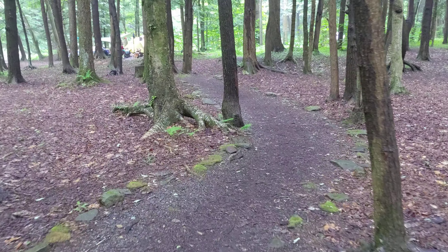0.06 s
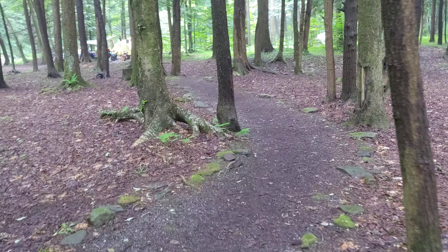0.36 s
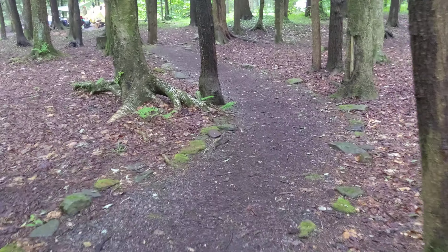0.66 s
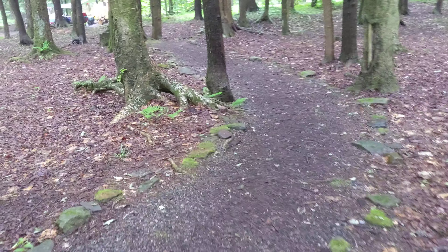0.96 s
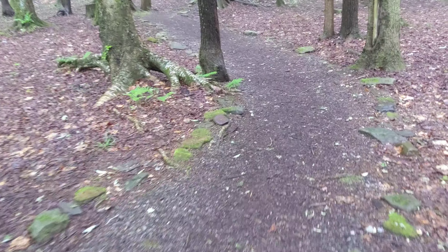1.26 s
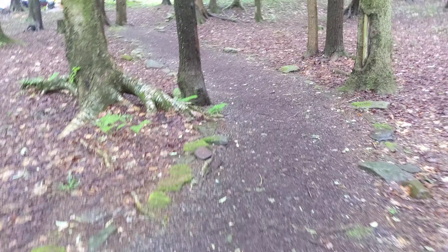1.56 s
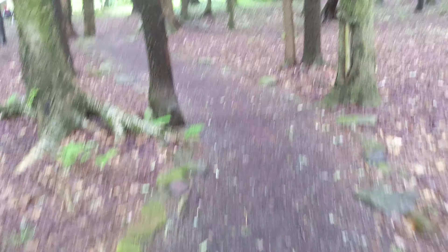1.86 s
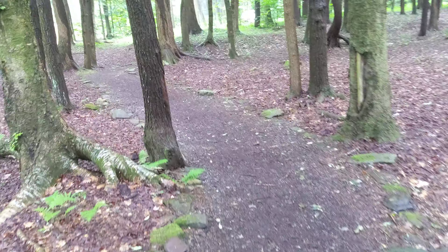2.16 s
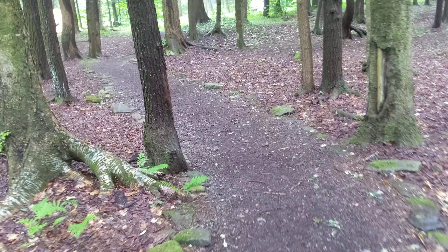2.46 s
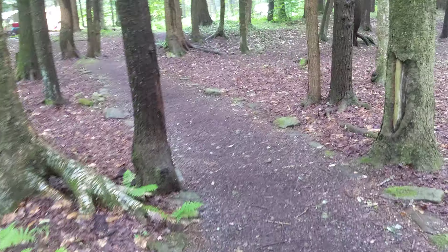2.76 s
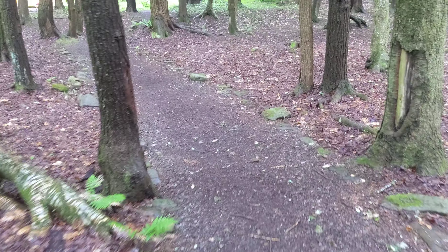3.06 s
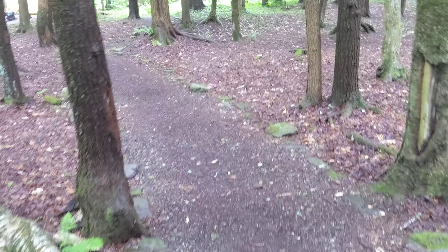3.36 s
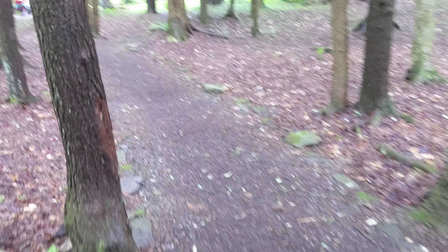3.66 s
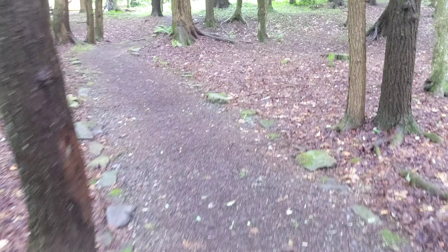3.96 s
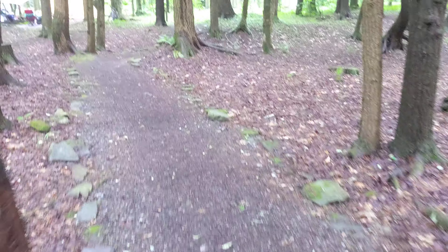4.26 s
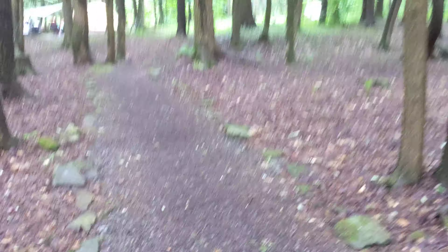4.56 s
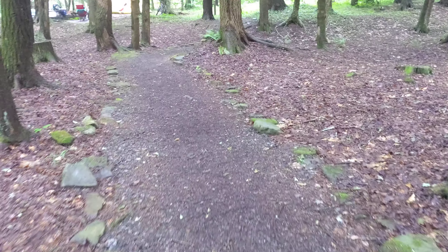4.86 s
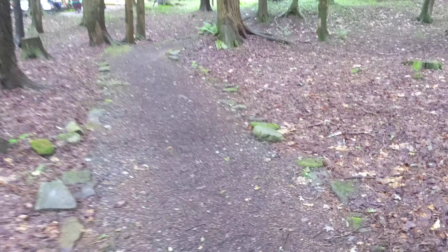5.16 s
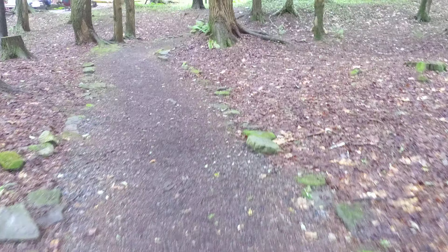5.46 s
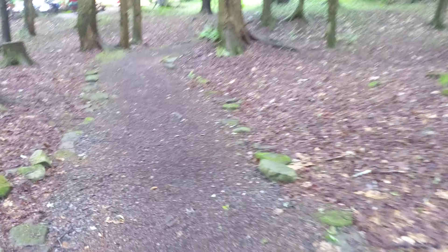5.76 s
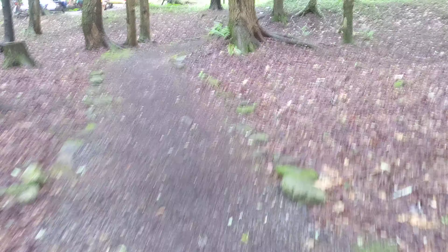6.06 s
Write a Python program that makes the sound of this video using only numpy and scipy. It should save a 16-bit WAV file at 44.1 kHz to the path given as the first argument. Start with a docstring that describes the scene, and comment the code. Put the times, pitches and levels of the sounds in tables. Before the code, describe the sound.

A close songbird on the right whistles rapid, high, gliding chirps from the start, each leaving a long echo among the trees. Just below the moving microphone, soft footsteps thud on a dirt trail about every 0.6 seconds, with light gritty crunches, scuffs and pebble ticks. A faint, short, hoarse bird call comes from far off at 1 second. Twigs snap underfoot, sharpest at about 1.4 seconds, and again near 3.3, 5.7 and 6. From 1.8 to 2.5 seconds a quick trill of falling notes sounds on the right. Between 2.7 and 4.1 seconds a thin, very high bird repeats a drooping whistle on the left. The near song thins after 3.7 seconds, and a farther bird gives six rising notes from 4.3 to 5.4. A quiet woodland hush runs throughout, with a faint, low, distant engine hum growing from about 3 seconds.

```python
"""A dirt trail under tall trees, heard from a stereo microphone carried at walking pace. From the start
a near bird whistles on the right, the trunks scattering each note into a long tail, while just below
the microphone soft steps thud, scuff the grit and snap twigs. A hoarse call comes from far off at one
second and a trill follows near two. Midway a thin voice droops on the left; then a farther bird repeats
a rising slur, and a distant engine hum grows over the hush of the wood."""
import sys
import numpy as np
from scipy import signal
from scipy.fft import rfft, irfft
from scipy.io import wavfile
from scipy.ndimage import uniform_filter1d

SR = 44100
rng = np.random.default_rng(int(sys.argv[2]) if len(sys.argv) > 2 else 0)


def wrap_up_sound(samples):
    """Save the sound to the file named by the first command line argument, as 16-bit audio."""
    columns = np.atleast_2d(samples).T
    # keep every value between -1 and 1, then stretch to whole-number steps
    tamed = np.clip(columns, -1, 1)
    steps = np.round(tamed * 32767).astype(np.int16)
    wavfile.write(sys.argv[1], SR, steps)


N = 269607
TIME = np.arange(N) / SR


def amp(db):
    """Decibels to gain."""
    return 10 ** (np.asarray(db) / 20)


def unit(x):
    """Scales to rms 1."""
    return x / np.sqrt(np.mean(x ** 2) + 1e-20)


def read(points, hz):
    """A table's value on a log-frequency axis."""
    f, value = np.transpose(points)
    return np.interp(np.log(hz + 1), np.log(f + 1), value)


def sides(db):
    """Left and right gains of constant power; positive dB leans left."""
    pair = np.array([amp(db / 2), amp(-db / 2)]).reshape(2, -1)
    return pair / np.sqrt(np.mean(pair ** 2, axis=0))


def add(mix, s, sound):
    """Mixes a sound in at s seconds."""
    part = mix[..., max(round(s * SR), 0):][..., :sound.shape[-1]]
    part += sound[..., :part.shape[-1]]


def colour(x, gain):
    """Filters by a gain that is a function of frequency."""
    return irfft(rfft(x) * gain(np.fft.rfftfreq(x.shape[-1], 1 / SR)), x.shape[-1])


def wander(hz):
    """Random drift of rms 1, up to about hz."""
    return unit(colour(rng.standard_normal(N), lambda f: 1 / (1 + (f / hz) ** 4)))


def band(x, hz, q):
    """A broad resonance that rings after its cause."""
    return signal.lfilter(*signal.iirpeak(min(hz, SR / 3), max(q, .4), SR), x)


def from_right(pair, lag_s):
    """A sound from the right reaches the left microphone a little later."""
    return colour(pair, lambda f: np.exp(-2j * np.pi * f * np.array([[lag_s], [0]])))


# The wood's background. Each row: frequency in Hz, relative spectral level in dB.
HUSH_SPECTRUM = [(20, -35), (32, 6.5), (55, 0.5), (110, 1.5), (170, 1), (300, -5.5), (450, -8.5),
                 (700, -3.5), (900, -7.5), (1350, -2), (2000, -9), (5000, -6.5), (9000, -22), (12500, -19),
                 (15500, -27.5)]
# Its swell. Each row: time in seconds, level in dB.
HUSH_SWELL = [(0, -52), (2, -51.5), (4, -51), (5.2, -48.5), (6.1, -49.5)]
# Its width. Each row: frequency in Hz, likeness of the two channels from 0 to 1.
HUSH_LIKENESS = [(30, 0.51), (100, 0.61), (500, 0.87), (1200, 0), (2500, 0.33), (5000, 0), (12000, 0.06)]
# Its lean. Each row: frequency in Hz, left over right in dB.
HUSH_PAN = [(100, -2), (1000, 0), (3000, -4), (8000, -3.5), (14000, -1)]
def hush(patch_db=1.76):
    """Distant air and leaves in drifting patches, most alike at both microphones in the low range."""
    hz = np.fft.rfftfreq(1024, 1 / SR)
    a, b, c, d, patches = rng.standard_normal((N // 256 + 5, len(hz), 5)).T
    patches = unit(uniform_filter1d(uniform_filter1d(patches, size=12, axis=0), size=16, axis=1))
    likeness = read(HUSH_LIKENESS, hz)[:, None]
    left = a + 1j * b
    right = likeness * left + np.sqrt(1 - likeness ** 2) * (c + 1j * d)
    gain = amp(read(HUSH_SPECTRUM, hz)[:, None] + patch_db * patches)
    spectra = np.array([left, right]) * gain * sides(read(HUSH_PAN, hz))[:, :, None]
    air = signal.istft(spectra, nperseg=1024, noverlap=768)[1][:, :N]
    return unit(air) * amp(np.interp(TIME, *np.transpose(HUSH_SWELL)))


# The engine's growth. Each row: time in seconds, relative level in dB.
ENGINE_LEVEL = [(0, -81), (.45, -65), (2.1, -64), (2.6, -71), (2.85, -58), (3.4, -56.5), (4.2, -57),
                (4.7, -53), (6.1, -51.5)]
# Its note. Each row: time in seconds, pitch in Hz.
ENGINE_PITCH = [(0, 86.5), (1.8, 83.04), (3.2, 82.64), (4.2, 85.3), (6.1, 87.36)]
def engine_hum(gain_db=1.0, octave_db=-14, waver_db=1, waver_hz=0.41):
    """An engine far from the trail: a wavering low tone and its octave."""
    turns = np.cumsum(np.interp(TIME, *np.transpose(ENGINE_PITCH)) + waver_hz * wander(2.7)) / SR
    tone = np.sin(2 * np.pi * turns) + amp(octave_db + 2 * wander(4.8)) * np.sin(4 * np.pi * turns)
    db = np.interp(TIME, *np.transpose(ENGINE_LEVEL)) + gain_db + waver_db * wander(8.1)
    return np.sqrt(2) * tone * amp(db)


def far_call(start_s=0.98, length_s=0.11, level_db=-45, hz=1470, q=7, fade_db=-10, pan_db=-3):
    """One short hoarse note from far off, fading among the trees."""
    rasp = unit(band(band(rng.standard_normal(SR // 2), hz, q), hz, q)[:int(length_s * SR)])
    fade = amp(level_db + fade_db * np.linspace(0, 1, len(rasp)))
    out = np.zeros(N)
    add(out, start_s, fade * rasp * signal.windows.tukey(len(rasp), .5))
    return out * sides(pan_db)


# The brightness of grit and stones. Each row: frequency in Hz, relative spectral level in dB.
GRIT_SPECTRUM = [(2000, -6), (5000, 7), (9000, 3.5), (12500, 5), (14200, -5), (15500, -7)]
# Crunches underfoot. Each row: start in seconds, length in seconds, relative level in dB.
SOLE_ROLLS = [(.05, 0.11, -60), (0.255, 0.11, -56), (0.378, 0.19, -59), (.86, 0.31, -60), (1.207, .17, -60),
              (1.44, 0.095, -52), (1.518, 0.1, -58), (1.67, 0.14, -61), (1.855, 0.27, -61),
              (2.056, 0.18, -62), (2.264, 0.12, -69), (2.382, 0.12, -64), (2.608, 0.11, -55),
              (2.715, 0.092, -56.5), (2.879, .07, -57), (2.94, .15, -66), (3.24, 0.22, -59.5),
              (3.46, 0.26, -73), (3.784, .11, -58), (3.87, 0.26, -68), (4.243, 0.12, -55.5),
              (4.39, 0.11, -53), (4.59, .08, -69), (4.872, 0.23, -58), (5.55, 0.15, -65), (5.808, .3, -72)]
def litter(ticks_per_s=2500, spread_db=-2.0, tick_s=0.00044, gain_db=-1, idle_db=-72):
    """Fine grit and leaf crumbs crunch in soft swells as the weight rolls over them."""
    weight = np.full(N, amp(idle_db))
    for s, length, db in SOLE_ROLLS:
        add(weight, s, amp(db) * signal.windows.hann(int(length * SR)))
    strengths = amp(spread_db * np.minimum(rng.exponential(1, N), 4))
    ticks = strengths * (rng.random(N) < ticks_per_s / SR)
    decays = signal.lfilter([1], [1, -np.exp(-1 / (tick_s * SR))], ticks)
    crackle = decays * rng.standard_normal((2, N))
    return amp(gain_db) * weight * unit(colour(crackle, lambda f: amp(read(GRIT_SPECTRUM, f))))


# Stones touching on the trail. Each row: time in seconds, relative level in dB.
STONE_TICKS = [(0.396, -48), (0.9287, -38), (1.024, -37.5), (1.4413, -48), (1.557, -49), (2.5173, -45),
               (2.745, -43), (3.333, -51), (3.594, -46), (4.16, -53), (4.64, -52), (4.927, -51),
               (5.105, -45), (5.48, -52), (6.0722, -30.5)]
def pebbles(t60=0.0063, lead_s=.005, scatter_db=-17, scatter_t60=0.12, grains_per_s=700, pan_db=-3):
    """Two small stones grind into a bright tick and scatter a few grains."""
    out, t = np.zeros((2, N)), np.arange(SR // 10) / SR - lead_s
    for s, db in STONE_TICKS:
        grains = unit(rng.standard_normal((2, len(t))) * (rng.random(len(t)) < grains_per_s / SR))
        tick = rng.standard_normal((2, len(t))) * amp(-60 * abs(t) / t60)
        scatter = grains * amp(scatter_db - 60 * abs(t) / scatter_t60)
        add(out, s - lead_s, amp(db) * (tick + scatter))
    return colour(out, lambda f: amp(read(GRIT_SPECTRUM, f))) * sides(pan_db)


# Soles slipping. Each row: start in seconds, length in seconds, relative level in dB, band centre in Hz.
SOLE_SLIPS = [(0.295, 0.11, -54.5, 946), (0.893, 0.073, -55, 700), (1.001, 0.049, -42, 780),
              (1.101, 0.055, -54, 887), (1.227, 0.079, -52, 900), (1.449, 0.05, -47.5, 1630),
              (2.416, 0.052, -50, 800), (3.314, 0.053, -43.5, 1400), (3.8, 0.063, -54, 1030),
              (4.489, 0.088, -52.5, 755), (4.991, 0.063, -49, 1720), (5.016, 0.043, -33, 2760),
              (5.584, 0.14, -52, 840)]
def scuffs(grains_per_s=1500, spread_db=2.5, q=0.4, dull_hz=3300, pan_db=-4):
    """Grains of damp dirt slip under the sole in a short swell."""
    out, size = np.zeros(N), SR // 4
    for s, length, db, hz in SOLE_SLIPS:
        grains = rng.standard_normal(size) * amp(spread_db * rng.exponential(1, size))
        grains *= rng.random(size) < grains_per_s / SR
        swell = signal.windows.hann(int(length * SR))
        scrape = unit(band(band(grains, hz, q), hz, q)[:len(swell)])
        add(out, s, amp(db) * swell * scrape)
    return colour(out, lambda f: 1 / np.sqrt(1 + (f / dull_hz) ** 8)) * sides(pan_db)


# Twigs underfoot. Each row: time in seconds, click level in dB, lower and upper band edge in Hz.
TWIGS = [(0.1255, -32, 1400, 3000), (0.1337, -28.5, 1520, 1820), (0.341, -35, 600, 1580),
         (0.9286, -34.5, 350, 1690), (1.024, -29.5, 340, 1290), (1.03, -34, 594, 2000),
         (1.4411, -9, 1250, 2780), (1.557, -22, 1090, 2460), (1.5821, -17.5, 450, 1490),
         (2.768, -33, 550, 1590), (3.3331, -22, 493, 1690), (5.663, -27, 600, 1400),
         (5.6998, -18, 760, 1310), (6.0724, -22, 1100, 3120)]
def twig_snaps(bounce_s=0.0055, bounce_db=-19, rattle_db=-25, rattle_t60=0.06, pan_db=-4.5):
    """A twig snaps close by: a dry click, its bounce off the ground and a faint rattle."""
    out, t = np.zeros(N), np.arange(SR // 10) / SR
    for s, db, low_hz, high_hz in TWIGS:
        twig = np.vstack([signal.butter(2, low_hz, "high", fs=SR, output="sos"),
                          signal.butter(7, high_hz, fs=SR, output="sos")])
        click = signal.sosfilt(twig, signal.unit_impulse(len(t)))
        click /= abs(click).max()
        rattle = unit(signal.sosfilt(twig, rng.standard_normal(len(t))))
        rattle *= amp(rattle_db - 60 * t / rattle_t60)
        start = s - np.argmax(abs(click)) / SR
        add(out, start, amp(db) * (click + rattle))
        add(out, start + bounce_s, amp(db + bounce_db) * click)
    return out * sides(pan_db)


# Footfalls below the microphone. Each row: start in seconds, relative level in dB,
# opening pitch in Hz, seconds to fall by 60 dB.
FOOTFALLS = [(0.327, -42.5, 272, 0.14), (0.924, -42, 265, 0.18), (1.53, -41.5, 166, 0.083),
             (2.109, -39, 190, 0.12), (2.666, -31.5, 426, 0.025), (3.177, -41.5, 235, 0.053),
             (3.284, -38, 213.5, 0.16), (3.857, -43.5, 270.6, 0.2), (4.424, -39, 213, 0.25),
             (5, -27, 288, 0.062), (5.566, -40.5, 241, 0.21), (6.07, -27, 237, 0.092)]
def steps(sag=0.447, sag_s=0.014, rise_s=0.00011, knock_db=-3,
          earth_db=-6, earth_ratio=0.79, earth_q=0.79, pan_db=-4):
    """A heel thuds on packed earth: a sagging low knock inside a dull burst of crumbling soil."""
    out, t = np.zeros(N), np.arange(SR // 4) / SR
    for s, db, hz, t60 in FOOTFALLS:
        turns = np.cumsum(hz * (1 - sag + sag * np.exp(-t / sag_s))) / SR
        earth_hz = hz * earth_ratio
        earth = unit(band(band(rng.standard_normal(len(t)), earth_hz, earth_q), earth_hz, earth_q))
        thud = amp(knock_db) * np.sin(2 * np.pi * turns) + amp(earth_db) * earth
        add(out, s, thud * amp(db - 60 * t / t60) * (1 - np.exp(-t / rise_s)))
    return out * sides(pan_db)


# The tail among the trees. Each row: frequency in Hz, seconds to fall by 60 dB.
TRUNK_DECAY = [(2500, 1.76), (4200, 1.4), (5500, 2.06), (8000, 1.4)]
def trunks(x, build_s=0.0017, first_per_s=260, thicken_s=.07, early_db=6, early_s=.045):
    """Scatter from many trunks: single echoes at first, then ever denser ones that die by band."""
    size = 2 * SR
    per_s = np.minimum(first_per_s * (1 + np.arange(size) / SR / thicken_s) ** 2, 2500)
    polarity = np.sign(rng.standard_normal((2, size)))
    taps = polarity * (rng.random((2, size)) < per_s / SR) / np.sqrt(per_s)
    hz, t, spectra = signal.stft(taps, SR, nperseg=256)
    t60 = read(TRUNK_DECAY, hz)[:, None]
    near_db = early_db * np.exp(-t / early_s)  # the nearest trunks crowd the first echoes
    shape = amp(near_db - 60 * t / t60) * (1 - np.exp(-t / build_s)) / np.sqrt(t60)
    tail = signal.istft(spectra * shape, SR, nperseg=256)[1]
    tail /= np.linalg.norm(tail, axis=1, keepdims=True)
    return signal.fftconvolve(x[None], tail, axes=1)[:, :N]


# Where the echoes come from. Each row: frequency in Hz, left over right in dB.
ECHO_PAN = [(2500, -2), (3400, -15.5), (4300, -10), (5200, -7), (6200, -6), (7000, -4), (8000, 0.5)]
def passing_trunks(x, change_s=0.5763, count=3):
    """Echo patterns fade into one another as the microphone moves among the trunks."""
    turn = np.pi * (TIME / change_s + np.arange(count)[:, None] / count)
    echoes = sum(trunks(x * share) for share in np.sqrt(2 / count) * np.cos(turn))
    return colour(echoes, lambda f: sides(read(ECHO_PAN, f)))


# A faint whistle on the left. Each row: start in seconds, length in seconds, relative level in dB.
HELD_NOTES = [(3.45, 0.12, -54), (3.55, 0.13, -47), (3.841, 0.14, -48), (4.072, .1, -57)]
def thin_whistle(hz=7711, waver_hz=16, flutter_db=3, pan_db=3, gain_db=-7):
    """A very high, nearly pure note that swells on one pitch and lingers among the trunks."""
    strength = np.zeros(N)
    for s, length, db in HELD_NOTES:
        add(strength, s, amp(db) * signal.windows.hann(int(length * SR)))
    turns = np.cumsum(hz + waver_hz * wander(60)) / SR
    tone = np.sqrt(2) * np.sin(2 * np.pi * turns) * strength * amp(flutter_db * wander(40))
    return amp(gain_db) * (tone + trunks(tone)) * sides(pan_db)


def glide(from_hz, to_hz, ease=1.172):
    """Pitches of a note that moves fast at first and settles on its last pitch."""
    return to_hz + (from_hz - to_hz) * np.array([1, 2 / 3, 1 / 3, 0]) ** ease


# A glide grows as it goes: accents in dB at its start and end.
GLIDE_ACCENTS = [-1.5, 0.7]
# Faint high shimmer over the near song, and distant twitter.
# Each row: start and end in seconds, lowest and highest pitch in Hz, relative level in dB.
TWITTER_BOUTS = [(0.384, .68, 7600, 9260, -62.5), (1.412, 1.52, 7240, 8150, -50.5),
                 (3.201, 4.16, 7280, 7920, -58.5), (4.16, 4.52, 6760, 8040, -52.5),
                 (4.498, 5.3, 2997, 4720, -55.5), (4.661, 4.78, 11100, 12400, -62),
                 (5.569, 5.78, 2704, 4870, -50)]
def twitter(per_s=70, length_s=0.01785, pan_db=-10, echo_db=20):
    """Bouts of faint glides at loose intervals, heard mostly as echo."""
    notes = []
    for start, end, low, high, db in TWITTER_BOUTS:
        levels = np.add(db, GLIDE_ACCENTS)
        for s, (late, first, last) in zip(np.arange(start, end, 1 / per_s), rng.random((64, 3))):
            pitches = glide(low + first * (high - low), low + last * (high - low))
            notes.append((s + late / per_s, length_s, pitches, levels, pan_db, echo_db))
    return notes


# Stress along a slur: accents in dB from start to end.
SLUR_ACCENTS = [-5, 1, 1, -1, -0.5, 2, -1]
# A farther bird. Each row: start in seconds, relative level in dB, first pitch in Hz.
RISING_SLURS = [(4.345, -52.5, 3740), (4.51, -45.5, 3787), (4.685, -45.5, 3760), (4.86, -45, 3606),
                (5.06, -46.5, 3324), (5.25, -47.5, 3550)]
def slurs(length_s=.14, rise_hz=(4143, 4456, 4985, 5480, 5670), pan_db=-4, echo_db=4,
          flick_at_s=.126, flick_s=0.019, flick_hz=(6700, 6100, 5800), flick_accents_db=(-8, 1)):
    """One rising slur repeated a little to the right, each ending in a quick downward flick."""
    rises = [(s, length_s, [hz, *rise_hz], np.add(db, SLUR_ACCENTS), pan_db, echo_db)
             for s, db, hz in RISING_SLURS]
    flicks = [(s + flick_at_s, flick_s, flick_hz, np.add(db, flick_accents_db), pan_db, echo_db)
              for s, db, _ in RISING_SLURS]
    return rises + flicks


# Stress along a drooping note: accents in dB from start to end.
DROOP_ACCENTS = [-1.5, -3, 1.5, -3.5, 5.5]
# A thin voice on the left. Each row: start in seconds, relative level in dB.
DROOPING_NOTES = [(2.725, -45.5), (2.98, -50.5), (3.24, -47), (3.5, -47), (3.746, -47), (3.961, -49)]
def droops(length_s=.18, pitches_hz=(7280, 7010, 6990, 6690, 5280), pan_db=3, echo_db=2):
    """A bird holds a high note and lets it drop, loudest at the bottom."""
    return [(s, length_s, pitches_hz, np.add(db, DROOP_ACCENTS), pan_db, echo_db)
            for s, db in DROOPING_NOTES]


# A trill on the right. Each row: start in seconds, first and last pitch in Hz, relative level in dB.
TRILL_NOTES = [(1.804, 5070, 4140, -34), (1.912, 4720, 4154, -33.5), (2.006, 4627, 4255, -30),
               (2.105, 4620, 4190, -30.5), (2.203, 4564, 4140, -31), (2.302, 4570, 4145, -31),
               (2.402, 4580, 4120, -32.5)]
def trill(length_s=.041, accents_db=(-0.5, 1.5, 1.8), pan_db=-7, echo_db=1.5):
    """A quick run of like down-slurs that starts high and settles."""
    return [(s, length_s, glide(first, last), np.add(db, accents_db), pan_db, echo_db)
            for s, first, last, db in TRILL_NOTES]


# The near bird's glides. Each row: start and length in seconds, first, middle and last pitch in Hz,
# relative level in dB, echo weight in dB.
SONG_GLIDES = [(0.0, 0.023, 4570, 4396, 4230, -35.5, 8), (0.03, 0.029, 4060, 3670, 3470, -36.5, 6),
               (.083, 0.053, 5880, 6440, 5280, -44, 4), (0.151, 0.096, 3985, 4144, 4040, -39.5, 5),
               (0.304, 0.043, 6000, 6480, 5180, -42.5, 4), (0.26, 0.026, 7060, 7400, 7450, -48.5, 7),
               (0.375, 0.033, 4170, 3884, 3300, -29, -1.5), (0.409, 0.034, 3190, 2930, 2830, -40.5, 18),
               (0.443, 0.034, 3000, 3770, 4600, -35.5, 2), (0.458, 0.043, 4770, 4740, 4600, -36, 7),
               (0.483, 0.026, 4310, 3830, 3240, -38, -12), (.605, 0.034, 4830, 5180, 5230, -36, 11),
               (0.639, .032, 5020, 4370, 3880, -36.5, 4), (.692, 0.043, 6460, 6930, 7180, -45.5, 4),
               (0.761, 0.045, 5160, 5180, 5250, -36, 4), (.762, 0.061, 3180, 3476, 3840, -38.5, 8),
               (.803, 0.02, 3580, 3784, 3800, -26, 7.5), (0.819, 0.034, 3753, 3450, 3280, -31, 1),
               (0.851, .05, 3470, 3660, 4010, -36, 9), (0.893, 0.061, 3840, 4247, 4400, -32.5, 3.5),
               (.925, 0.061, 3630, 3680, 3720, -36, -7), (1.004, 0.04, 4156, 4270, 4580, -32.5, 1.5),
               (1.065, 0.036, 5430, 5950, 6130, -37.5, 13), (1.19, 0.087, 6480, 7050, 7480, -44, 7),
               (1.32, 0.029, 6750, 6080, 5250, -40, 5), (1.347, .024, 5220, 5140, 5170, -33, -1),
               (1.518, 0.032, 6700, 6000, 5250, -40, 2), (1.54, 0.023, 5210, 5150, 5200, -34, 0),
               (1.678, 0.052, 7980, 7700, 7300, -47, 8), (1.763, 0.034, 3360, 3750, 4250, -42, 3),
               (1.801, 0.05, 3660, 3285, 2700, -40.5, 5), (1.865, .02, 2800, 3430, 4100, -50, 3),
               (1.875, 0.031, 3870, 3100, 2850, -42.5, -2), (2.039, 0.055, 2820, 3300, 3830, -40.5, -2),
               (2.476, 0.033, 3500, 3627, 3280, -29, -6.5), (2.539, 0.053, 5390, 5405, 5470, -37.5, 20),
               (2.554, 0.058, 5190, 4700, 4460, -35, 10), (2.567, 0.051, 15100, 13300, 12700, -56, 1),
               (2.596, 0.046, 4287, 4256, 4310, -26.5, -4), (2.657, 0.057, 4360, 3600, 3260, -30, 3.5),
               (2.698, 0.052, 3360, 3015, 2795, -37.5, 5), (2.762, 0.051, 2937, 3334, 3460, -32.5, 1),
               (2.82, 0.027, 3490, 3510, 3550, -30.5, -5.5), (2.853, 0.069, 4970, 4660, 4530, -36.5, -4),
               (2.942, 0.058, 3586, 3850, 4020, -32.5, -1.5), (3.032, 0.039, 4770, 5310, 5470, -37.5, 5),
               (3.087, 0.03, 5080, 4540, 4430, -38.5, 0), (3.14, 0.066, 6100, 6310, 6340, -40, 0),
               (3.499, 0.027, 2910, 2750, 2770, -50, 7), (3.551, 0.04, 2510, 3300, 4010, -42.5, 6),
               (3.614, 0.043, 3025, 2996, 2890, -43, -4), (4.481, 0.052, 2700, 3110, 3640, -45.5, 15),
               (4.784, 0.034, 3300, 3450, 3670, -44, 1), (5.529, 0.072, 6100, 5880, 5770, -47, -2),
               (5.616, .05, 4540, 4530, 4530, -52, 25), (5.89, .055, 3590, 3590, 3610, -48.5, -1),
               (6.023, 0.04, 3600, 3620, 3550, -50, -2)]
# Where they sit. Each row: mean pitch in Hz, left over right in dB.
SONG_PAN = [(2600, -15), (3600, -17), (4300, -14), (5200, -8), (6200, -5), (7500, -6)]
# Stress along a hooked chirp: accents in dB from start to end.
HOOK_ACCENTS = [-1, -1.5, -4, 1.5, 2]
# Hooked chirps. Each row: start and length in seconds, pitch in Hz that hook_shape scales,
# relative level in dB, echo weight in dB.
SONG_HOOKS = [(3.266, .071, 6030, -35, 2), (3.637, .071, 5980, -36, -0.5)]
def song(hook_shape=(.8, 0.94, 0.97, 0.9, .8, .72, 0.685), hook_pan_db=-9):
    """The near bird, on the right: short glides, and chirps that flick up and plunge."""
    glides = [(s, length, pitches, np.add(db, GLIDE_ACCENTS), read(SONG_PAN, np.mean(pitches)), echo)
              for s, length, *pitches, db, echo in SONG_GLIDES]
    hooks = [(s, length, hz * np.array(hook_shape), np.add(db, HOOK_ACCENTS), hook_pan_db, echo)
             for s, length, hz, db, echo in SONG_HOOKS]
    return glides + hooks


# The voice's tremble, buzziest on the top notes. Each row: pitch in Hz, tremble depth in Hz.
VOICE_TREMBLE = [(3000, 49), (4300, 40.7), (5500, 69), (7000, 124), (8000, 160)]
def whistle(length, pitches, levels, tremble_s=.0022, edge_s=0.0038, octave_db=-42, db_per_octave=-0.5):
    """A bird's note glides through its pitches and levels, trembling, with soft ends and a faint octave."""
    along = np.linspace(0, 1, int(length * SR))
    hz = np.polyval(np.polyfit(np.linspace(0, 1, len(pitches)), pitches, len(pitches) - 1), along)
    db = np.interp(along, np.linspace(0, 1, len(levels)), levels)
    db += db_per_octave * np.log2(hz / hz.mean())  # the voice is stronger where it is lower
    tremble = np.interp(along * length / tremble_s, np.arange(400), rng.standard_normal(400))
    phase = 2 * np.pi * np.cumsum(hz + read(VOICE_TREMBLE, hz) * tremble) / SR
    tone = np.sin(phase) + amp(octave_db) * np.sin(2 * phase)
    return np.sqrt(2) * tone * amp(db) * signal.windows.tukey(len(along), 2 * edge_s / length)


def birds(direct_gain_db=-0.05, echo_gain_db=0.38, flutter_db=2.0, flutter_hz=90):
    """Each note reaches the microphone straight, fluttering through leaves, and again from the trunks."""
    direct, scattered = np.zeros((2, N)), np.zeros(N)
    for s, length, pitches, levels, pan_db, echo_db in song() + trill() + droops() + slurs() + twitter():
        tone = whistle(length, pitches, levels) / np.hypot(1, amp(echo_db))  # two paths share the power
        add(direct, s, sides(pan_db) * tone)
        add(scattered, s, amp(echo_db) * tone)
    flutter = unit(amp(flutter_db * wander(flutter_hz)))
    straight = amp(direct_gain_db) * from_right(direct * flutter, lag_s=.00004)
    return straight + amp(echo_gain_db) * passing_trunks(scattered * flutter)


def scene():
    """Hush and hum in the distance, feet below the microphone, birds above."""
    feet = from_right(steps() + twig_snaps() + scuffs(), lag_s=0.0001)
    return hush() + engine_hum() + litter() + pebbles() + feet + far_call() + birds() + thin_whistle()


def record(dry, low_cut_hz=47, high_cut_hz=15800):
    """Trims the deepest rumble and the highest treble."""
    thinned = signal.sosfilt(signal.butter(3, low_cut_hz, "high", fs=SR, output="sos"), dry)
    band_limit = signal.firwin(511, high_cut_hz, window=("kaiser", 9), fs=SR)
    return signal.oaconvolve(thinned, band_limit[None], "same")


dry = scene()
out = record(dry)
wrap_up_sound(out)
```